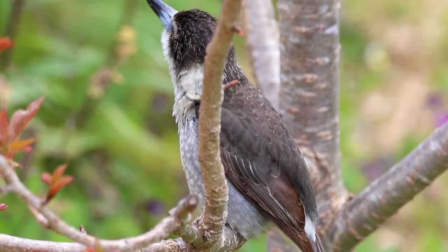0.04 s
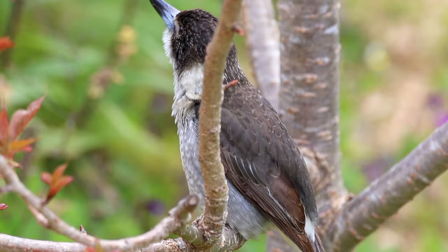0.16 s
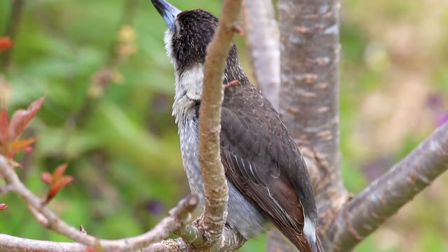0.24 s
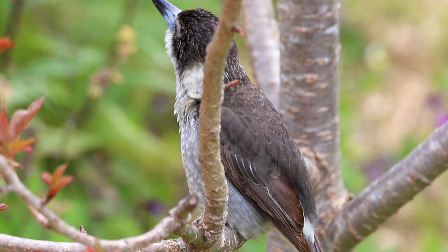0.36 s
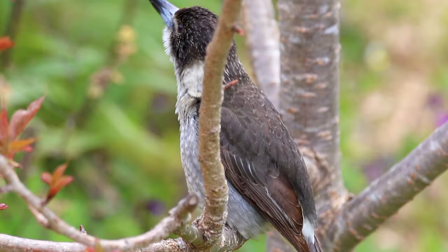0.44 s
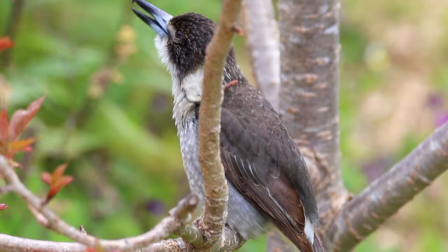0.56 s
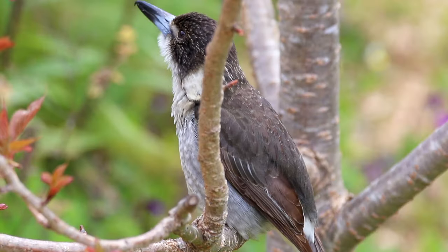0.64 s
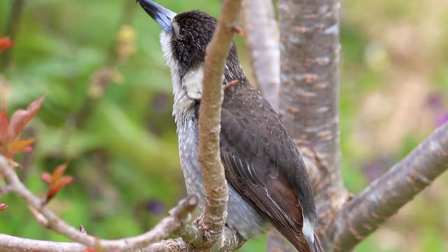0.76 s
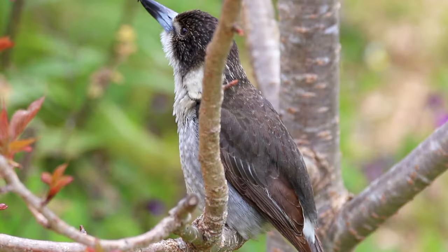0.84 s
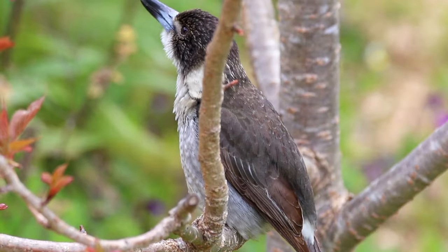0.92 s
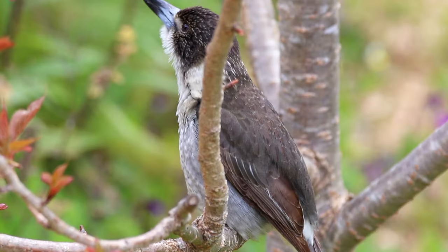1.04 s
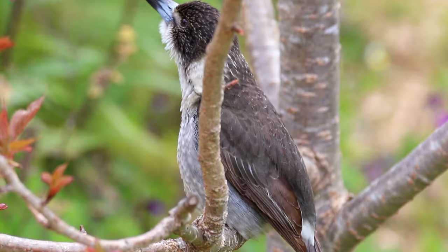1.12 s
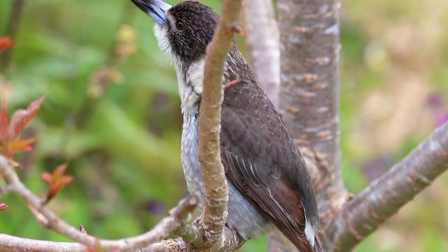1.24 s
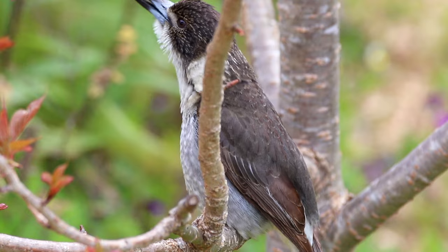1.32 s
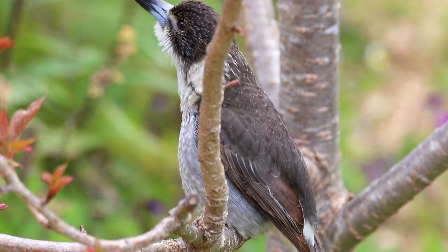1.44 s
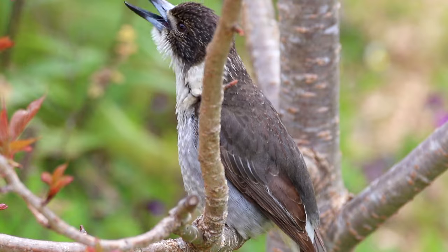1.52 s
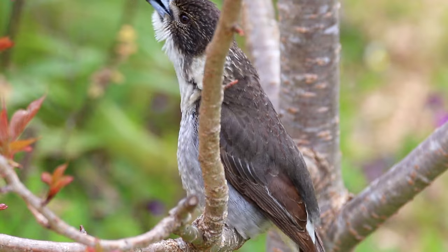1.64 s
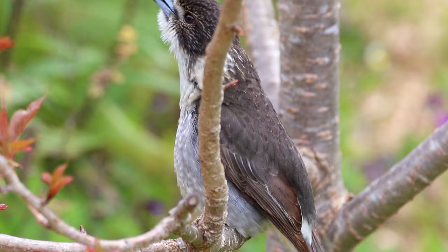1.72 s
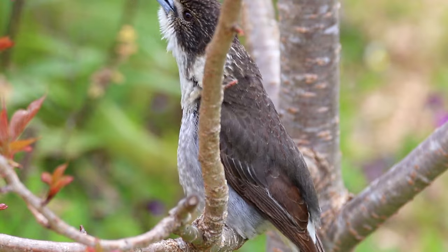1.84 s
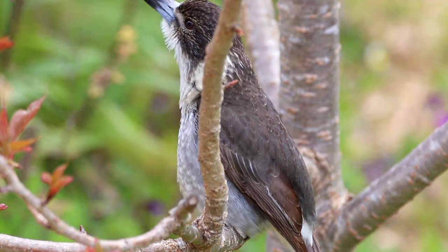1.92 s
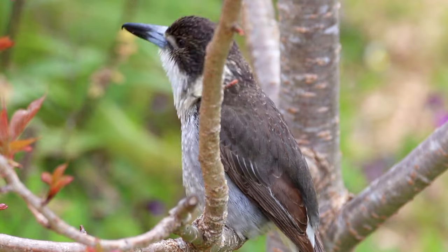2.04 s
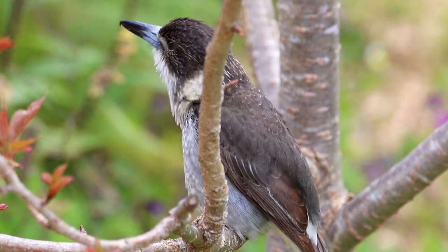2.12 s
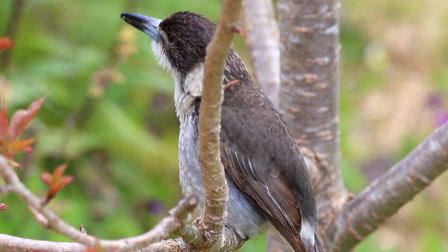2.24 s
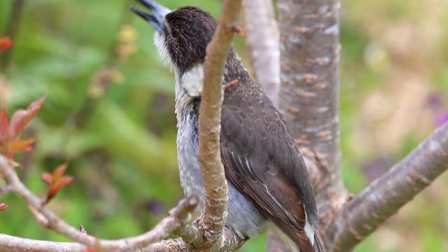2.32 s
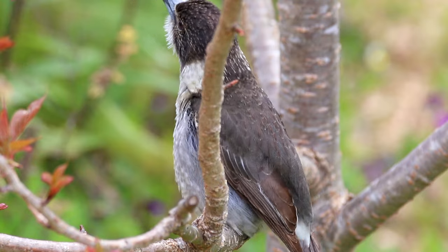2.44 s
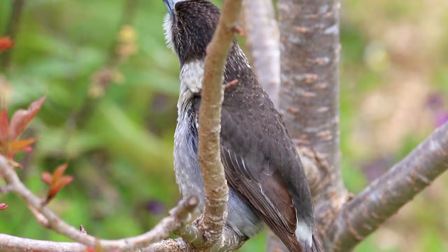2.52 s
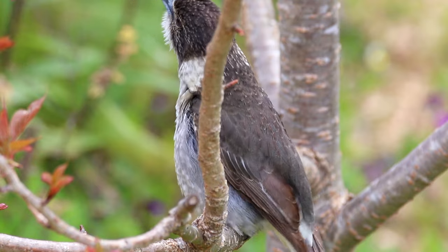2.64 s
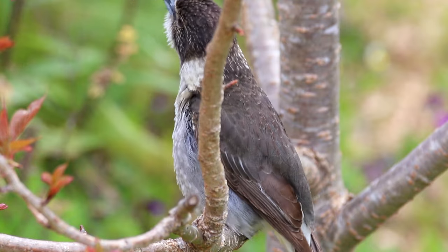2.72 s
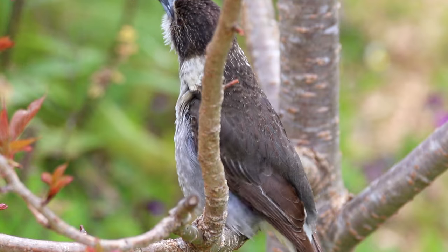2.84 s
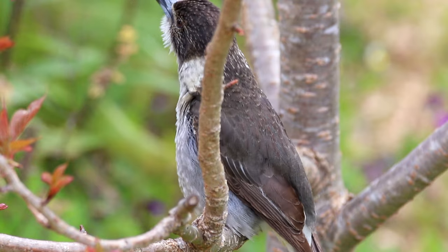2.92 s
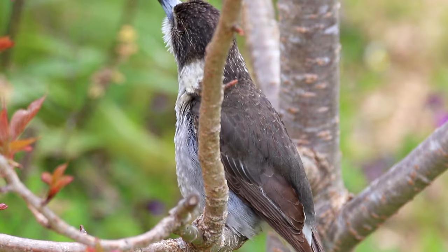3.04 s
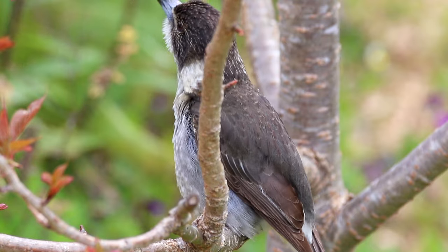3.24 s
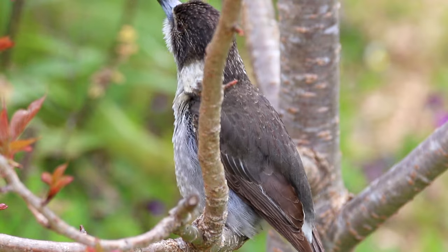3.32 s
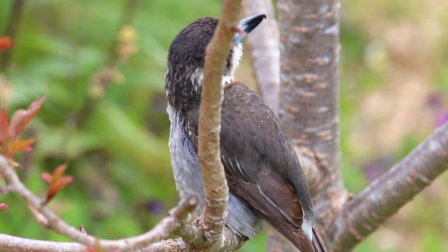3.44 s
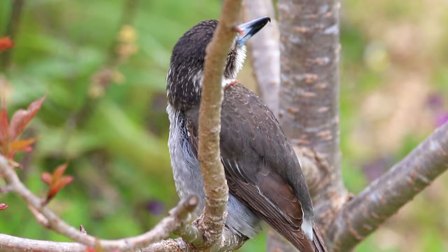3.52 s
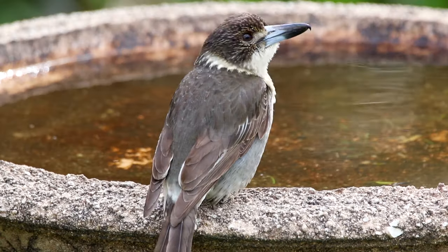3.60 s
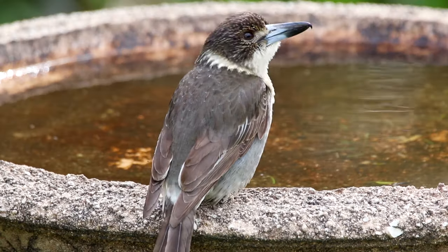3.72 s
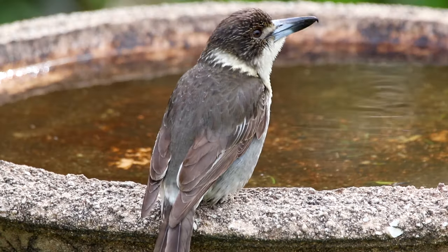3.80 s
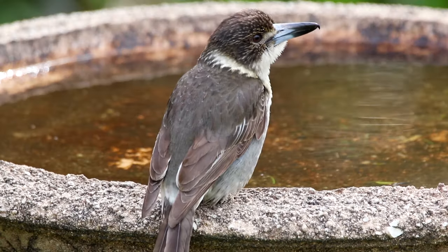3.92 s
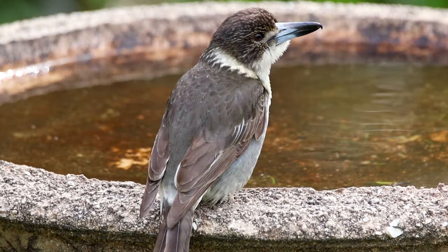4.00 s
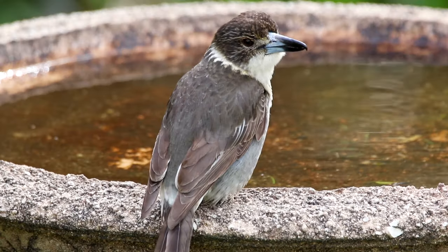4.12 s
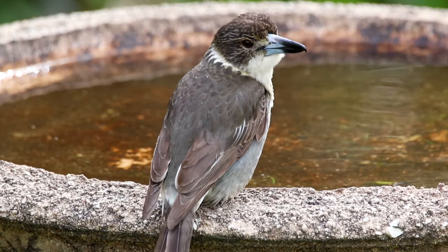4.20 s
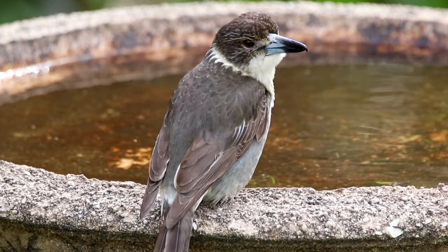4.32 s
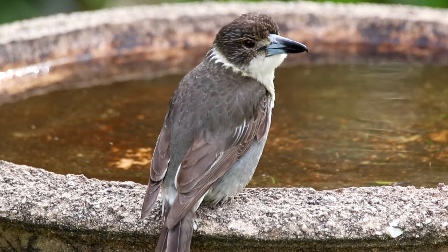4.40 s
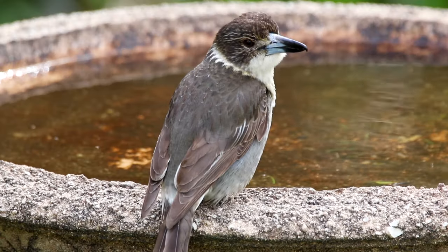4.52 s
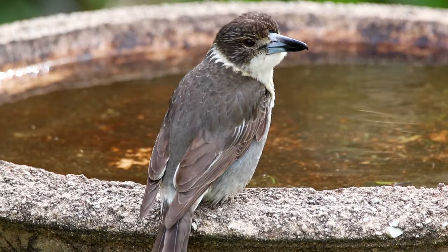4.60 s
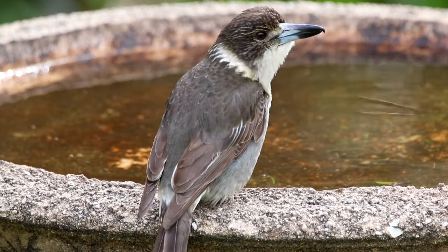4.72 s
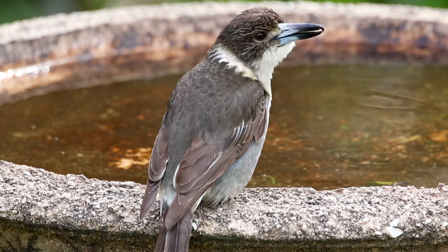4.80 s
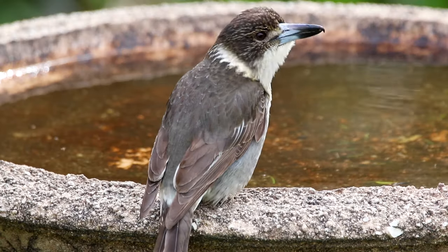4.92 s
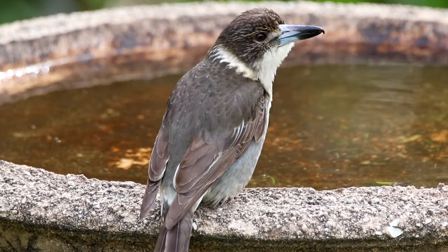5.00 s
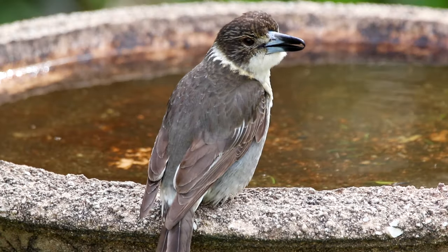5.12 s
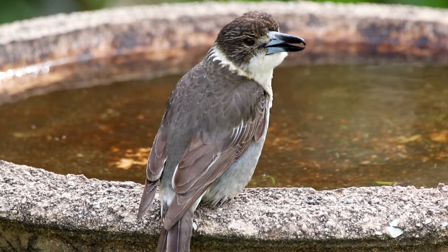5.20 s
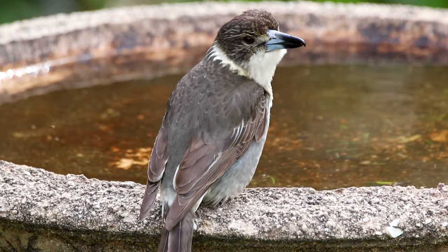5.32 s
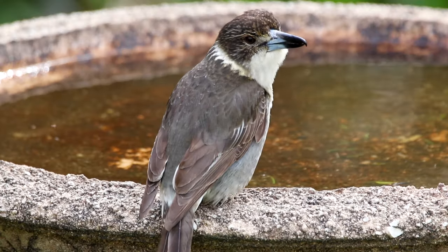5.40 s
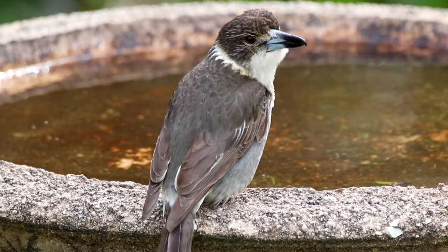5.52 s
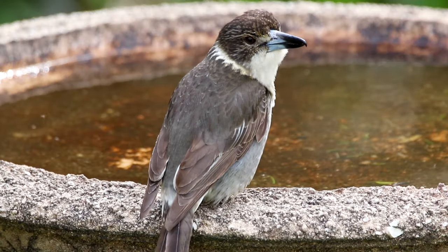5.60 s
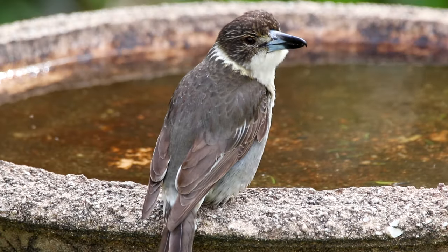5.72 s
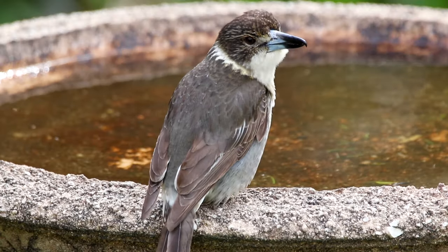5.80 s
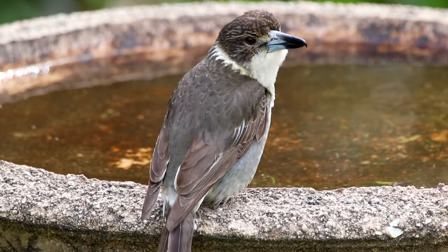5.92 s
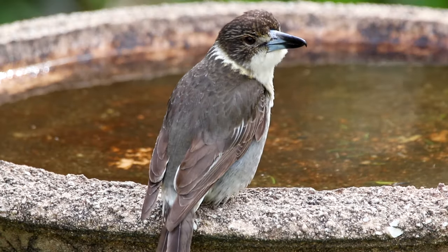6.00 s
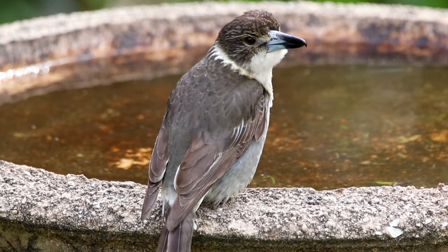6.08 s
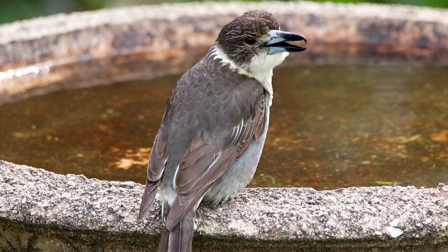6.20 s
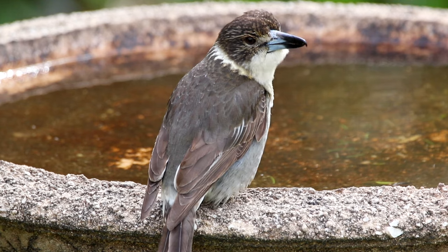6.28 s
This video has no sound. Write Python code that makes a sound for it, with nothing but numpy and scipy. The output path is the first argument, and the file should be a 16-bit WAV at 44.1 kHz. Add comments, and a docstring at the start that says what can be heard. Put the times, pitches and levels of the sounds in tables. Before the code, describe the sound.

Rich, flute-like bird whistles swell to a loud phrase and ring briefly off trunks and walls, then turn sparse and soft over faint road rumble.

```python
"""Garden bird song

A songbird close by pipes soft upward and downward slurs, a loud fluted phrase, then soft slurs again.
Each note is a gliding near-pure whistle with thin overtones that rings back from trunks and walls.
Other birds whistle, chirp and rasp (band-limited noise) far off.
Under it lie distant traffic, made of coloured noise, and a passing engine hum, made of one wavering tone."""
import sys
import numpy as np
from scipy import signal
from scipy.fft import rfft, irfft, next_fast_len
from scipy.io import wavfile
from scipy.ndimage import uniform_filter1d, map_coordinates

SR = 44100
rng = np.random.default_rng(int(sys.argv[2]) if len(sys.argv) > 2 else 0)


def persist_wave(psi):
    """Save psi, clipped to +-1, as 16-bit WAV."""
    counts = np.round(np.clip(psi, -1, 1) * 32767).astype(np.int16)
    wavfile.write(sys.argv[1], SR, np.atleast_2d(counts).T)


def field_ratio(decibels):
    """Amplitude ratio for a level in dB (20 dB per decade); scalars and array-likes work."""
    return 10 ** (np.asarray(decibels, dtype=float) / 20)


N = 280035  # length in samples


def unit(x):
    """Scale to rms 1."""
    return x / np.sqrt(np.mean(x ** 2) + 1e-20)


def along(points, hz):
    """Read (Hz, value) points at the given pitches, on a log pitch axis."""
    point_hz, value = np.transpose(points)
    return np.interp(np.log(hz + 1), np.log(point_hz + 1), value)


def curves(rows, t):
    """Each column after the time, read at times t."""
    seconds, *columns = np.transpose(rows)
    return [np.interp(t, seconds, column) for column in columns]


def wobble(rate, size):
    """A smooth random curve through rate random points a second."""
    at = np.arange(size) * rate / SR
    return map_coordinates(rng.standard_normal(size // 64), [at])


# Strength of the voice's overtones 2, 3, and so on. Each entry: level in dB.
OVERTONES = [-1.5, -3, -10, -11, -9.5, -12.5, -8.5, -17, -11, -7, -28]
# How windpipe and open beak colour the overtones. Each row: pitch in Hz, lift in dB.
BEAK = [(1500, 14.5), (3000, -4.5), (4000, -9), (5000, -2.5), (6200, 1.5), (7500, 0), (9500, 0.5),
        (11000, -4.5), (13000, -9.5), (15500, -16)]
OVERTONE_DIP_SHARE, LARGEST_DIP_DB = 0.41, 17  # overtones dip less by this share, up to this dip
OPEN_DB_PER_OCTAVE = 12  # the beak opens for high pitches and lets the overtones out
SWELL_DULL = 0.25  # while a note swells, dB lost per octave of overtone for each dB still to go


def whistle(rows, voice, fade, waver, tremble_db):
    """A gliding tone with its overtones; soft notes are duller and tremble more than loud ones."""
    # each row: time in seconds, pitch in Hz, level in dB
    # voice: overtone lift in dB, even-overtone lift in dB, slope in dB per octave, mouth resonance in Hz,
    # dulling in dB as the beak closes over the last third (below zero brightens)
    bright_db, even_db, slope_db, mouth_hz, closing_db = voice
    t = np.arange(rows[0][0] - fade, rows[-1][0] + fade, 1 / SR)
    hz, db = [uniform_filter1d(c, size=110) for c in curves(rows, t)]
    softness = 1 + np.clip((-37.5 - db.max()) / 8, 0, 2)
    wavering_hz = hz * (1 + softness * waver * wobble(154.2, len(t)))
    phase = 2 * np.pi * np.cumsum(wavering_hz) / SR
    tone = np.sin(phase)

    # fast slurs shake the membranes
    glide_speed = uniform_filter1d(np.abs(np.gradient(np.log(hz))) * SR, size=200)
    glide = np.clip(glide_speed / 25, 0, 1)
    over_db = bright_db + OVERTONE_DIP_SHARE * np.clip(db.max() - db, 0, LARGEST_DIP_DB)
    over_db += OPEN_DB_PER_OCTAVE * np.log2(hz / hz.max())
    over_db -= closing_db * np.clip(np.linspace(-2, 1, len(t)), 0, 1)
    to_go_db = db.max() - np.maximum.accumulate(db)
    for k, order_db in enumerate(OVERTONES, 2):
        source_db = order_db + even_db * (1 - k % 2) + slope_db * np.log2(k / 4)
        source_db = source_db - SWELL_DULL * to_go_db * np.log2(k / 2)
        # the mouth cavity lifts the overtone nearest its resonance
        mouth_db = 7.1 / (1 + (np.log(k * hz / mouth_hz) / 0.13) ** 2)
        filter_db = mouth_db + along(BEAK, k * hz) - 2.13 * softness
        gain = field_ratio(over_db + source_db + filter_db + 2.56 * wobble(52.7, len(t)))
        # overtones splinter into noisy sidebands
        gain *= 1 - .5 * glide + (0.083 + 1.24 * glide) * wobble(498.6, len(t))
        below_limit = k * hz < SR / 2.5
        tone += gain * below_limit * np.sin(k * phase + k)

    # the voice opens and shuts quickly
    edge = np.clip(np.minimum(t - t[0], t[-1] - t) / fade, 0, 1)
    level = field_ratio(db + softness * tremble_db * wobble(121.0, len(t)))
    return np.sqrt(2) * edge * level * tone


# How long the far walls ring. Each row: pitch in Hz, time in seconds to die away by 60 dB.
FAR_WALLS = [(700, 1), (1500, 0.88), (3000, 0.64), (5000, 0.62), (8000, 0.67), (13000, 0.59)]
# Scatter off near trunks and leaves. One row: time to die away by 60 dB in seconds, build-up in seconds.
TRUNKS = (0.18, 0.0019)
# One facing wall. One row: delay in seconds, level in dB, time for its smear to die by 60 dB in seconds.
FACING_WALL = (0.065, -24.5, 0.017)


def garden(wet_db, early_db):
    """Direct sound, quick dense scatter, a wall's slap and a long tail with its own ring time at each pitch."""
    hz, t, z = signal.stft(rng.standard_normal(SR), SR, nperseg=256)
    decay = field_ratio(-60 * t / along(FAR_WALLS, hz)[:, None])
    walls = signal.istft(z * decay, SR, nperseg=256)[1][:SR]
    t = np.arange(SR) / SR
    scatter_s, build_up_s = TRUNKS
    scatter = rng.standard_normal(SR) * field_ratio(-60 * t / scatter_s)
    answer = field_ratio(wet_db) * walls / np.linalg.norm(walls)
    answer += field_ratio(early_db) * scatter / np.linalg.norm(scatter)
    answer *= 1 - np.exp(-t / build_up_s)

    delay_s, slap_db, smear_s = FACING_WALL
    slap = rng.standard_normal(SR) * field_ratio(-60 * t / smear_s)
    answer += field_ratio(slap_db) * np.roll(slap / np.linalg.norm(slap), round(delay_s * SR))
    answer[0] = 1  # the direct sound
    return answer / np.linalg.norm(answer)


def birds(notes, wet_db, early_db, fade, waver, tremble_db):
    """Every note rings through the garden, each with a freshly drawn random tail."""
    out = np.zeros(N + 3 * SR)  # one spare second ahead of the scene
    for voice, rows in notes:
        loudest_db = max(row[2] for row in rows)
        # soft notes are sung turned away, so more is echo
        away_db = 0.27 * np.clip(-38 - loudest_db, 0, 16)
        dry_note = whistle(rows, voice, fade, waver, tremble_db)
        note = signal.fftconvolve(dry_note, garden(wet_db, early_db + away_db))
        out[round((1 + rows[0][0] - fade) * SR):][:len(note)] += note
    return out[SR:SR + N]


def near_bird(notes):
    """The singer close by: a steady whistle with little echo from the far walls."""
    return birds(notes, wet_db=-13.0, early_db=-4.0, fade=.003, waver=0.0042, tremble_db=1.35)


def bent(events, voice):
    """Notes that swell, hold and sink while the pitch passes through start, middle and end."""
    at = np.array([0, 0.33, .5, 0.64, 1])  # share of the note's length
    swell_db = np.array([-5, 0, 0, 0, -5.5])
    notes = []
    for start, length, db, *hz in events:
        pitch = np.interp(at, [0, .5, 1], hz)
        rows = np.transpose([start + at * length, pitch, db + swell_db]).tolist()
        notes.append((voice, rows))
    return notes


# Far whistles; the first row is the dying end of a note begun before the scene.
# Each row: start in seconds, length in seconds, level in dB, start, middle and end pitch in Hz.
FAR = [(-.03, 0.038, -49.5, 1740, 1756, 1790), (.03, .06, -69.5, 4580, 4560, 4430),
       (.06, .013, -62, 3400, 2930, 2600), (.66, .08, -72, 6010, 6170, 6100),
       (.7, .24, -67, 2865, 3225, 3100), (1.18, .08, -76, 5900, 5900, 5900),
       (1.97, .15, -69, 3160, 3100, 3110), (2.135, .06, -73, 7230, 7260, 6900),
       (3.545, .095, -71, 2770, 3160, 3200), (3.81, .09, -65, 1425, 1694, 1664),
       (4.69, .02, -66.5, 2610, 2480, 2300), (6.05, .1, -70, 2640, 3150, 2760),
       (6.205, .06, -64, 2370, 2440, 2460), (6.275, .035, -55, 2810, 2800, 2780),
       (6.312, 0.022, -50, 2710, 2820, 2860)]
# Their voice. One row: overtone lift in dB, even-overtone lift in dB, slope in dB per octave,
# mouth resonance in Hz, closing dulling in dB.
FAR_VOICE = (-22, 1, -0.5, 5504, .1)


def far_whistles():
    """A dying note end, then faint bent whistles, with more far-wall echo than the singer has."""
    return birds(bent(FAR, FAR_VOICE), wet_db=-9.5, early_db=-6.5, fade=.007, waver=0.0037, tremble_db=1.16)


# Colour of the road noise. Each row: pitch in Hz, relative strength in dB.
TRAFFIC = [(12, -45), (20, -29), (144, -3.5), (245, -2), (307, -10), (343, -5.5), (394, -7.5), (465, -7),
           (707, -8), (1130, -10.5), (1500, -15.5), (2410, -20.5), (5110, -28), (15600, -32)]
# Slow drift of the rush. Each row: time in seconds, level in dB, treble lift in dB, bass lift in dB.
AIR = [(0.0, -58.5, -4.5, -6), (1.17, -60.5, -3.5, 2), (2.23, -61, 0.5, 4), (3.22, -62, -1.5, 2),
       (3.59, -60.5, -1, 8.5), (4.01, -58.5, -1.5, 6), (4.93, -59, -1.5, 4), (5.34, -58, -1, 6),
       (5.87, -58.5, -2, 3.5), (6.35, -58.5, -2, 0)]


def traffic(patchy_db, swell_db):
    """Far road noise: a dull rush of coloured noise with faint drifting patches."""
    hz, s, z = signal.stft(rng.standard_normal(N + SR), SR, nperseg=1024)
    level_db, lift_db, bass_db = curves(AIR, s)
    field = uniform_filter1d(rng.standard_normal(z.shape), size=8, axis=0)
    patches = unit(uniform_filter1d(field, size=8, axis=1))
    colour = field_ratio(along(TRAFFIC, hz))
    body = (hz > 60) & (hz < 700)  # the band that sets the level
    colour /= np.sqrt(np.sum(colour[body] ** 2) / len(hz))
    treble = np.clip(np.log2(hz / 500 + 1e-9) / 3, 0, 1)[:, None]
    bass = np.clip(np.log2(150 / (hz + 1)), 0, 1)[:, None]
    drift_db = level_db + lift_db * treble + bass_db * bass + patchy_db * patches
    rush = signal.istft(z * colour[:, None] * field_ratio(drift_db), SR, nperseg=1024)[1][:N]
    return rush * field_ratio(swell_db * wobble(1.23, N))


# The passing engine. Each row: time in seconds, pitch in Hz, level in dB.
HUM = [(0, 205, -85), (1.3, 204, -75), (1.9, 204, -60.5), (2.5, 205, -58.5), (3.0, 206, -64),
       (3.3, 210, -65), (4.2, 208, -72), (5.2, 213, -68), (6.35, 214, -62)]


def engine_hum():
    """A single tone whose pitch and level waver as the engine passes."""
    hz, db = curves(HUM, np.arange(N) / SR)
    phase = 2 * np.pi * np.cumsum(hz + 3 * wobble(11, N)) / SR
    return field_ratio(db + 1.0 * wobble(8.6, N)) * np.sin(phase)


# Soft hoarse rasps. Each row: start in seconds, length in seconds, level in dB, low and high edge in Hz.
RASPS = [(0, 0.067, -66, 2400, 5000), (0.455, 0.059, -70.5, 5500, 6650), (2.19, 0.12, -65, 2500, 6430),
         (3.286, 0.12, -69, 2820, 7150), (3.351, 0.13, -65.5, 3180, 5220), (3.959, 0.053, -70, 1800, 6000),
         (4.198, 0.16, -65, 2180, 4470), (4.31, 0.15, -70, 2500, 5200), (5.02, 0.023, -67, 2000, 4500),
         (6.269, 0.063, -58, 1810, 3180), (6.275, 0.07, -68, 6000, 8000)]


def rasps(flutter_db):
    """Breathy scolds: fluttering noise in a broad throat band that leans to its low edge."""
    out = np.zeros(N + SR)
    for start, length, db, low_hz, high_hz in RASPS:
        size = next_fast_len(round(length * SR))
        hz = np.fft.rfftfreq(size, 1 / SR) + 1
        edges = np.sqrt((1 + (low_hz / hz) ** 12) * (1 + (hz / high_hz) ** 12))
        band = (low_hz / hz) ** 1.1 / edges
        band *= field_ratio(3 * np.cos(2 * np.pi * hz / rng.uniform(600, 915)))  # blurred harmonic ridges
        hiss = unit(irfft(rfft(rng.standard_normal(size)) * band, size))
        level = field_ratio(db + flutter_db * wobble(71, size))
        out[round(start * SR):][:size] += level * np.hanning(size) ** .5 * hiss
    return signal.fftconvolve(out, garden(wet_db=4, early_db=-13.0))[:N]


# Voice of all slurs. One row: overtone lift in dB, even-overtone lift in dB, slope in dB per octave,
# mouth resonance in Hz, closing dulling in dB.
SLUR_VOICE = (-22.5, 0.5, 1, 4400, 2)


def slurs(events, form):
    """The singer's slurs: a shared form stretched to each one's length, pitch and level."""
    notes = []
    for start, length, db, top_hz, lean_db in events:
        rows = [(start + at * length, top_hz * ratio, db + form_db + lean_db * (1 - at))
                for at, ratio, form_db in form]
        notes.append((SLUR_VOICE, rows))
    return near_bird(notes)


# Shape of an upward slur. Each row: share of its length, share of its top pitch, level change in dB.
RISING = [(0, .36, -15.5), (0.332, .44, -3), (.55, 0.85, 2), (.76, 1, -6.5), (1, 1, -20)]
# Upward slurs. Each row: start in seconds, length in seconds, level in dB, top pitch in Hz,
# extra level towards the start in dB.
RISES = [(.165, 0.066, -42, 2212, 0.1), (.59, 0.087, -39, 2327, -1.5), (5.758, .072, -53, 2183, 12)]


def rising_slurs():
    """Soft whistles that glide up."""
    return slurs(RISES, RISING)


# Shape of a downward slur. Each row: share of its length, share of its top pitch, level change in dB.
FALLING = [(0, 1, -13), (.1, 0.94, -2.5), (.24, .78, -1.5), (.5, .55, 0), (1, 0.37, -11.5)]
# Downward slurs. Each row: start in seconds, length in seconds, level in dB, top pitch in Hz,
# extra level towards the start in dB.
FALLS = [(.333, 0.057, -46.5, 1903, -0.5), (.768, 0.052, -43, 2026, -1), (5.94, .058, -47.5, 1915, 3)]


def falling_slurs():
    """Soft whistles that glide down."""
    return slurs(FALLS, FALLING)


# Fluted notes. Each row: a voice, then a list of points.
# Voice: overtone lift in dB, even-overtone lift in dB, slope in dB per octave, mouth resonance in Hz,
# closing dulling in dB. Each point: time in seconds, pitch in Hz, level in dB.
FLUTED = [ ((-20.5, 4.5, .5, 5900, -5.5), [(1.022, 1880, -63), (1.035, 2304, -43.5), (1.05, 2035, -39),
          (1.065, 1974, -35.5), (1.077, 2377, -40), (1.086, 1934, -42), (1.095, 1470, -43),
          (1.11, 1650, -34), (1.124, 1740, -48)]), ((-20.5, 2.5, 4, 6700, -1), [(1.264, 1160, -58),
          (1.268, 1298, -40), (1.275, 1670, -40), (1.29, 1212, -34), (1.305, 999, -41.5),
          (1.32, 870, -42)]), ((-19, 2, -0.5, 6697, 14), [(1.323, 967, -42), (1.33, 1178, -37.5),
          (1.345, 1397, -32), (1.362, 1517, -31.5), (1.385, 1510, -35.5), (1.4, 1478, -31.5),
          (1.432, 1470, -34.5), (1.438, 1430, -58)]), ((-9.5, -3.5, -3, 6000, -4.5), [(1.59, 1890, -49),
          (1.6, 1945, -34.5), (1.612, 1788, -28.5), (1.628, 1766, -26), (1.64, 1717, -20),
          (1.645, 2330, -30), (1.653, 2344, -43)]), ((-24.5, -4.5, 2.5, 6493, 21), [(1.7, 1320, -42),
          (1.706, 1318, -34), (1.715, 1315, -26), (1.74, 1363, -28), (1.765, 1290, -21.5),
          (1.777, 1282, -39), (1.785, 1276, -23), (1.803, 1280, -60)]), ((-22, -10, 0, 6502, 10),
          [(1.865, 1208, -39.5), (1.88, 1244, -30.5), (1.9, 1307, -20), (1.907, 1323, -23.5),
          (1.914, 1303, -22), (1.925, 1287, -23), (1.936, 1221, -26), (1.942, 1179, -22),
          (1.955, 948, -32.5), (1.972, 788, -38.5)]), ((-30, -8, -2, 4000, 6), [(2.125, 812, -56),
          (2.14, 807, -42.5), (2.19, 790, -38.5), (2.232, 788, -45.5)]), ((-16.5, -2.5, -1, 4700, -12),
          [(2.408, 1886, -46), (2.425, 1870, -30), (2.445, 1788, -24), (2.455, 1706, -19),
          (2.472, 1585, -24.5), (2.481, 2277, -39.5), (2.492, 2300, -64)]), ((-9, 4, 4.5, 6000, 10),
          [(2.558, 1970, -50), (2.572, 1953, -38), (2.582, 2153, -40), (2.59, 2120, -60)]),
          ((-16, -1.5, 2.5, 4933, -7.5), [(2.655, 1830, -36.5), (2.662, 1790, -34.5), (2.675, 1773, -30.5),
          (2.685, 1752, -22.5), (2.695, 1695, -17.5), (2.704, 1624, -30), (2.712, 1548, -27),
          (2.728, 1623, -39)]), ((-14, -0.5, 1.5, 4750, -1), [(2.82, 1336, -43), (2.833, 1534, -28),
          (2.84, 1588, -26), (2.845, 1693, -21.5), (2.855, 1583, -24), (2.88, 1565, -23),
          (2.905, 1604, -17.5), (2.92, 1639, -23.5), (2.93, 2207, -36.5), (2.94, 2190, -49)]),
          ((-21.5, 3.5, 0.5, 4700, 1), [(2.992, 1406, -34), (3.002, 1501, -27), (3.012, 1471, -31)]),
          ((-34, -4, -1, 4000, .1), [(4.11, 1690, -60), (4.125, 2000, -60), (4.145, 1837, -52),
          (4.158, 1944, -55), (4.165, 2244, -53), (4.185, 1910, -59), (4.2, 1680, -55)]),
          ((-18.5, 1.5, -3, 4300, 2), [(5.237, 2180, -48.5), (5.255, 2120, -58), (5.275, 2018, -50),
          (5.284, 2110, -42), (5.291, 2600, -44.5), (5.298, 2760, -52)]), ((-32, -3, -5.5, 4400, 3),
          [(5.433, 1292, -46), (5.447, 1503, -47), (5.49, 1006, -47), (5.505, 1032, -56),
          (5.515, 1425, -34.5), (5.53, 1498, -36.5), (5.55, 1465, -31), (5.565, 1411, -39),
          (5.582, 1508, -45), (5.592, 1460, -55)]), ((-21, 2, -2, 6800, -14), [(6.275, 2310, -46.5),
          (6.295, 2164, -45), (6.312, 2175, -45), (6.325, 2530, -43), (6.345, 2480, -74)]), ]


def fluted_notes():
    """Whistles that each follow their own path of pitch and level, loudest in the middle phrase."""
    return near_bird(FLUTED)


# Short lead-ins. Each row: start in seconds, length in seconds, level in dB, start, middle and end pitch in Hz.
REEDY = [(2.802, 0.0154, -53.5, 853, 856, 1060), (2.977, 0.0117, -55, 800, 894, 1090)]
# Their voice. One row: overtone lift in dB, even-overtone lift in dB, slope in dB per octave,
# mouth resonance in Hz, closing dulling in dB.
REEDY_VOICE = (5, -4, -8, 2400, 11)


def reedy_lead_ins():
    """Brief notes ahead of loud ones, reedy because their overtones are strong."""
    return near_bird(bent(REEDY, REEDY_VOICE))


# Far chirps. Each row: start in seconds, length in seconds, level in dB, start, middle and end pitch in Hz.
CHIRPS = [(3.27, .055, -72.5, 1353, 1867, 1590), (3.935, .04, -69.5, 1310, 1410, 1287),
          (3.995, 0.022, -78, 1300, 1500, 1440), (4.32, .12, -73.5, 1002, 1282, 1477)]
# Their voice. One row: overtone lift in dB, even-overtone lift in dB, slope in dB per octave,
# mouth resonance in Hz, closing dulling in dB.
CHIRP_VOICE = (11.5, 3.5, -6.5, 4100, 2)


def far_chirps():
    """Faint nasal calls: strong overtones, unsteady pitch and plenty of echo."""
    return birds(bent(CHIRPS, CHIRP_VOICE), wet_db=-5.5, early_db=-4.5, fade=.006, waver=0.009, tremble_db=1.57)


# Plain notes. Each row: start in seconds, length in seconds, level in dB, start, middle and end pitch in Hz.
PLAIN = [(3.85, 0.094, -60, 1506, 1450, 1750), (4.203, 0.045, -48, 1517, 1478, 1450),
         (4.415, 0.073, -52.5, 1524, 1310, 1833), (4.83, 0.06, -53.5, 1140, 1238, 1165),
         (4.87, 0.036, -49, 1556, 2160, 2420), (5.008, .072, -47, 1374, 1130, 1027),
         (5.318, 0.031, -45, 1370, 1876, 1790), (6.245, .09, -52.5, 1220, 1532, 1860)]
# Their voice. One row: overtone lift in dB, even-overtone lift in dB, slope in dB per octave,
# mouth resonance in Hz, closing dulling in dB.
PLAIN_VOICE = (-26, -2, -6, 4000, .1)


def plain_notes():
    """Soft whistles that bend once, halfway."""
    return near_bird(bent(PLAIN, PLAIN_VOICE))


def scene():
    """The singer, the far birds and the road."""
    singer = rising_slurs() + falling_slurs() + fluted_notes() + reedy_lead_ins() + plain_notes()
    background_birds = far_whistles() + rasps(flutter_db=3.5) + far_chirps()
    road = traffic(patchy_db=1.02, swell_db=0.37) + engine_hum()
    return (singer + background_birds + road)[None]


def roll_off(x):
    """The treble ends steeply here."""
    return signal.sosfilt(signal.butter(12, 15710, fs=SR, output="sos"), x)


def record(dry):
    """Turn the finished mix into the output sound."""
    return roll_off(dry)


dry = scene()
out = record(dry)
persist_wave(out)
```